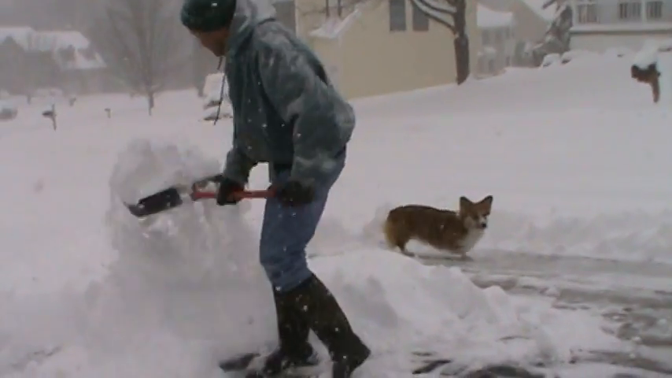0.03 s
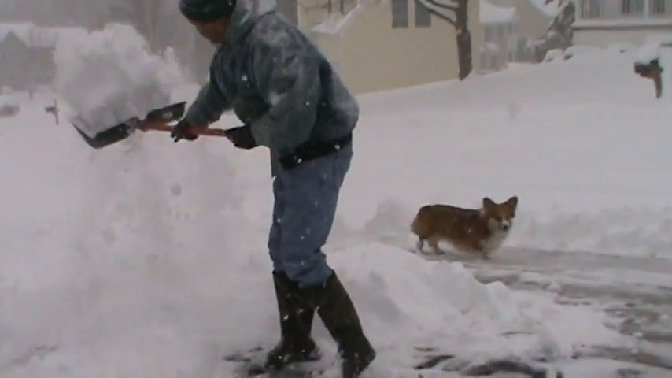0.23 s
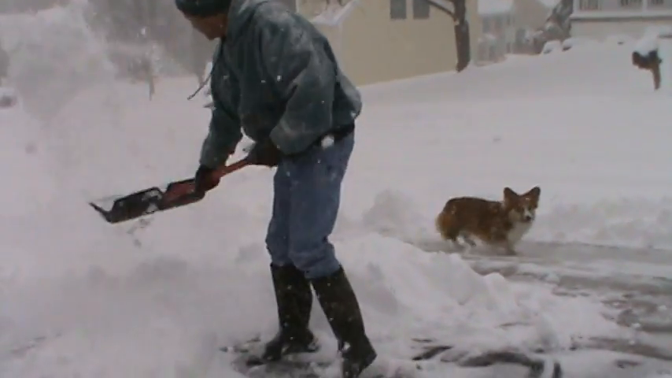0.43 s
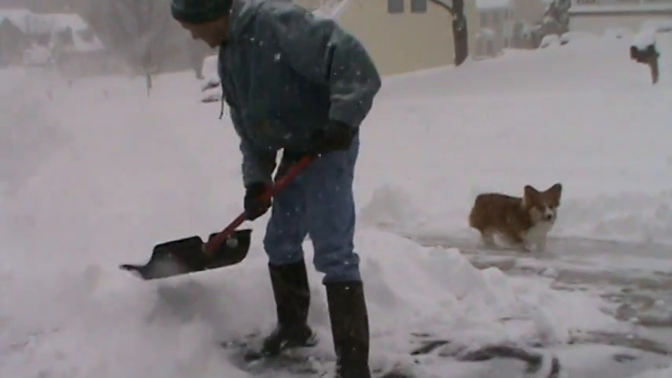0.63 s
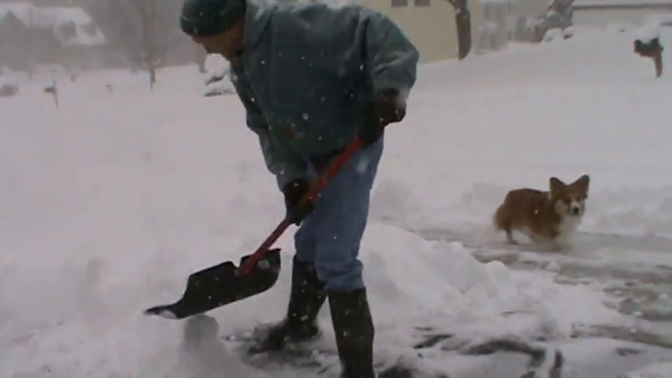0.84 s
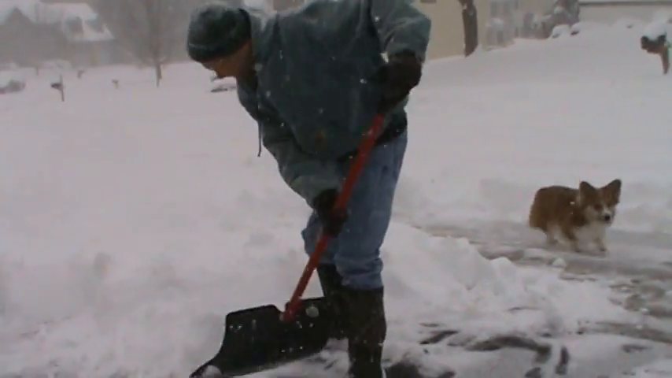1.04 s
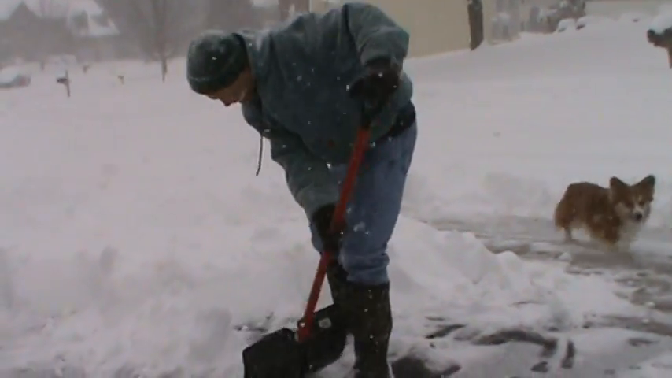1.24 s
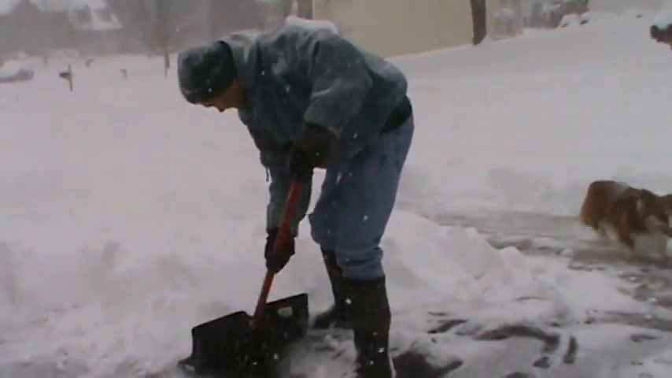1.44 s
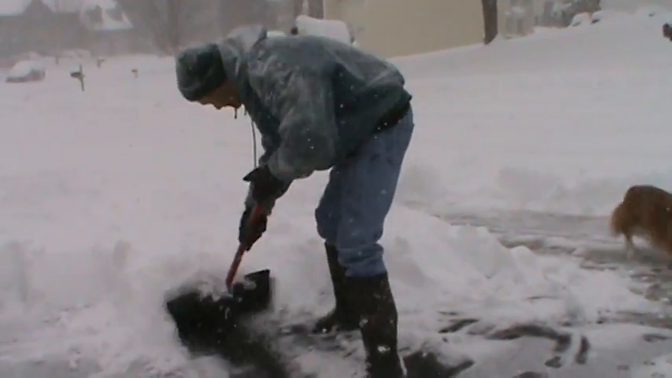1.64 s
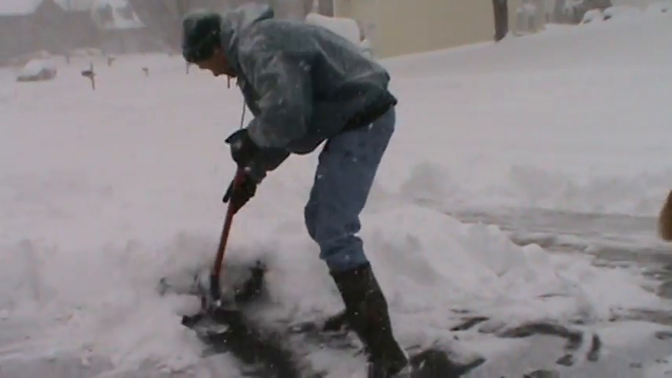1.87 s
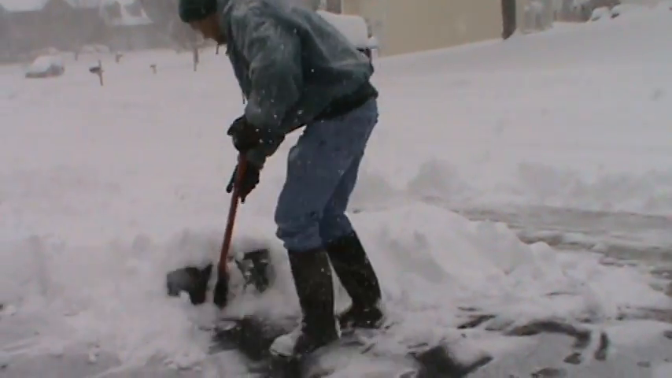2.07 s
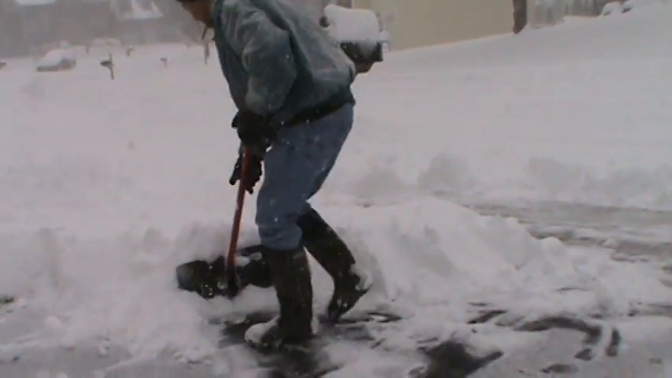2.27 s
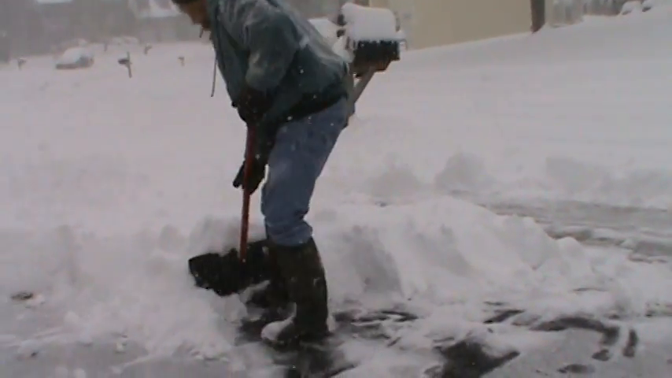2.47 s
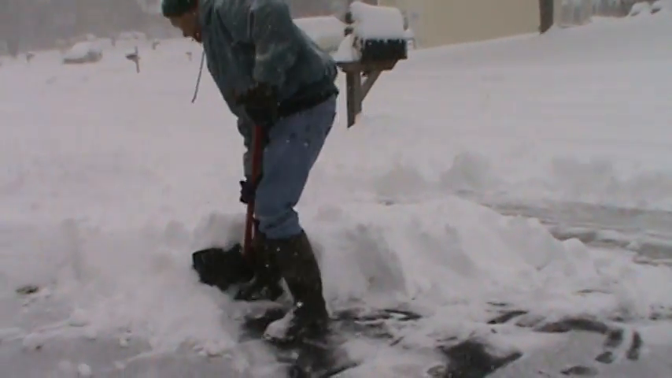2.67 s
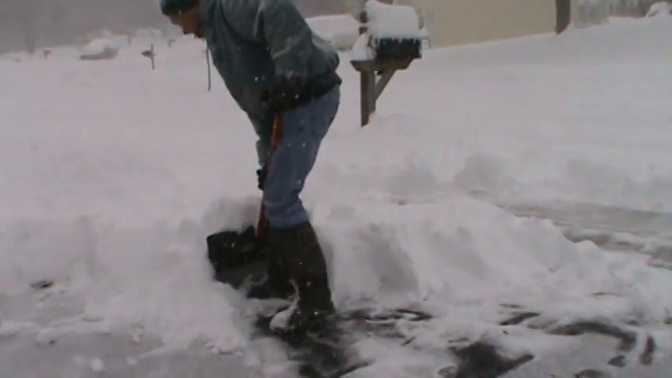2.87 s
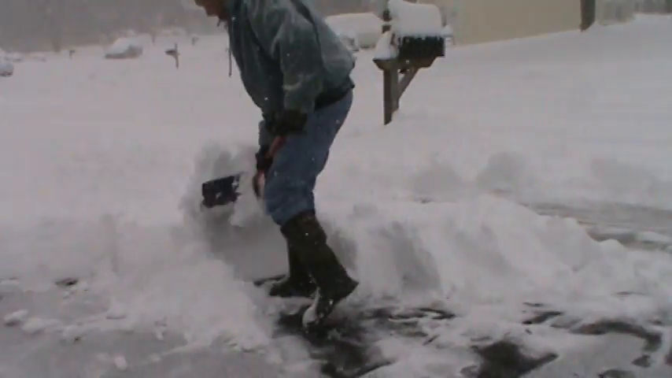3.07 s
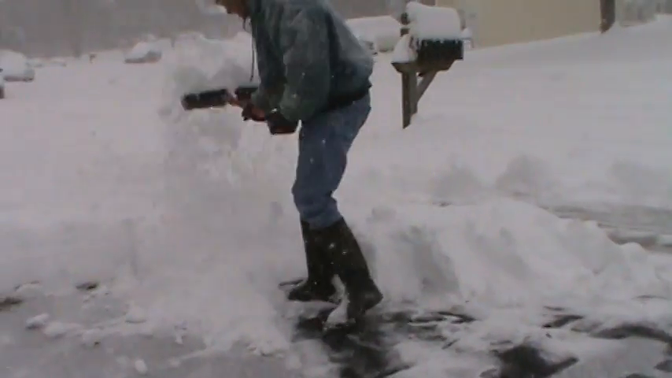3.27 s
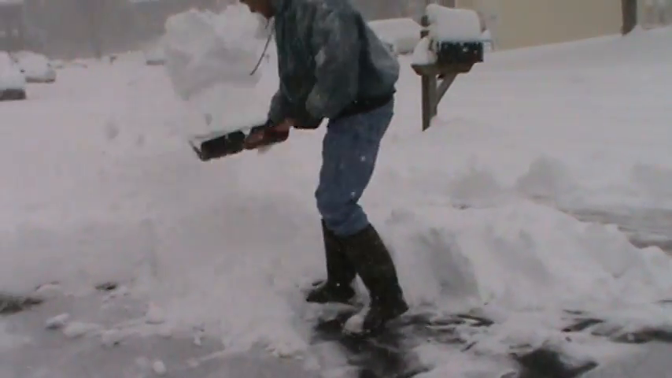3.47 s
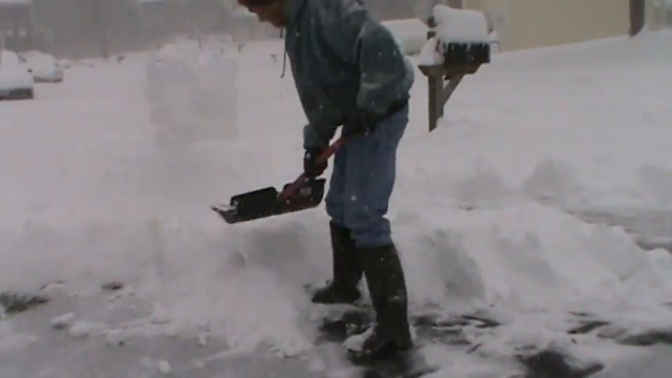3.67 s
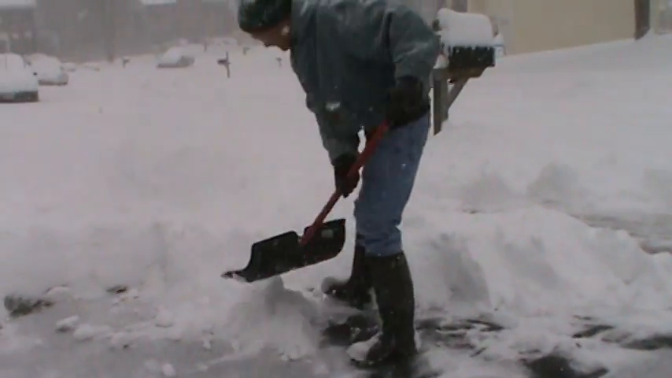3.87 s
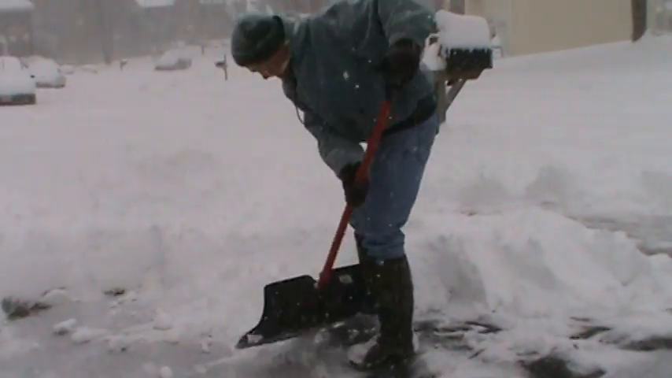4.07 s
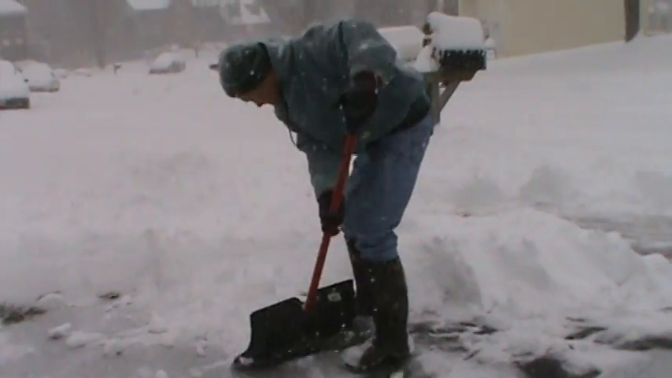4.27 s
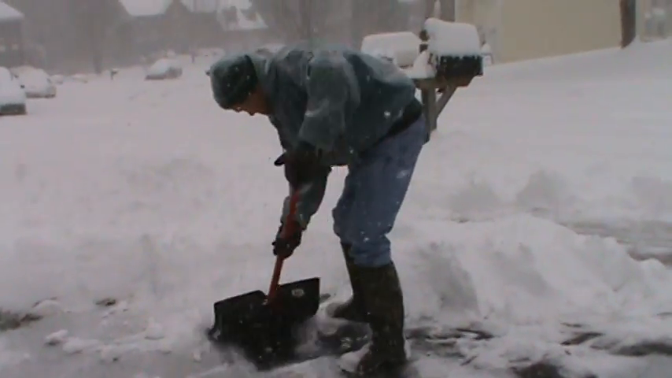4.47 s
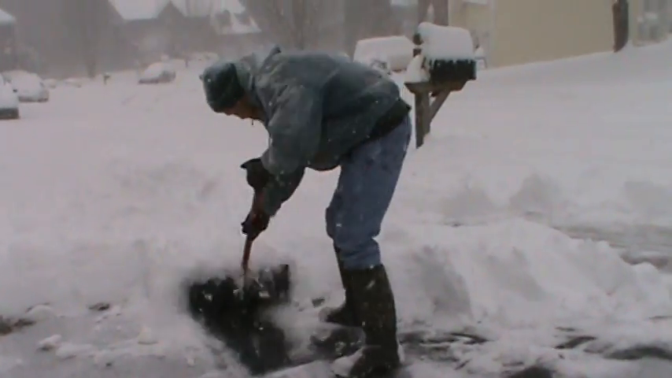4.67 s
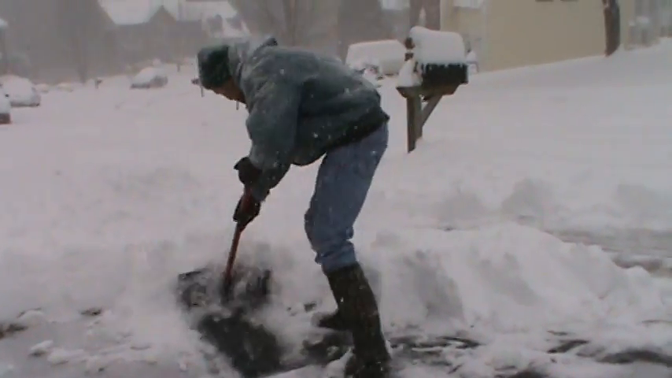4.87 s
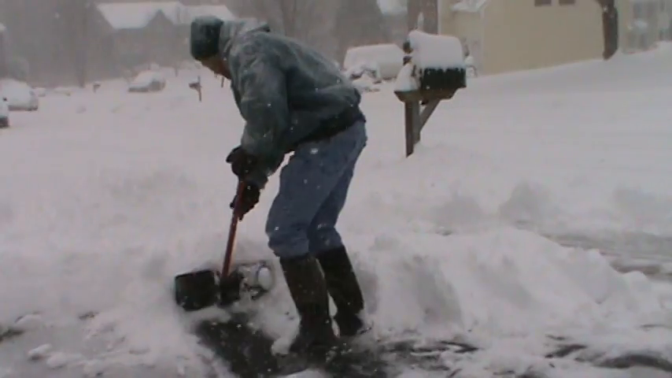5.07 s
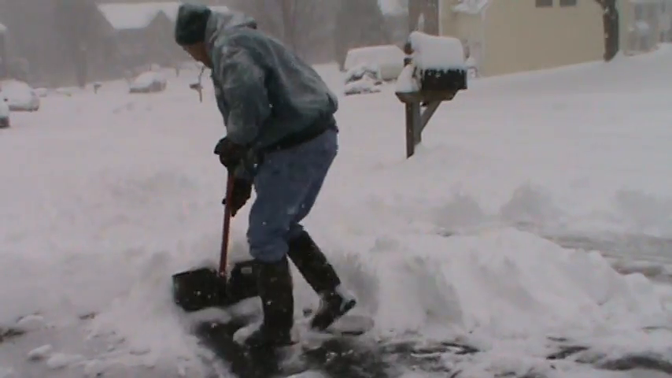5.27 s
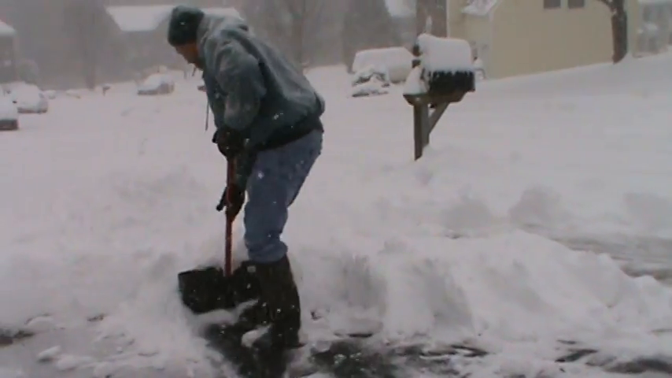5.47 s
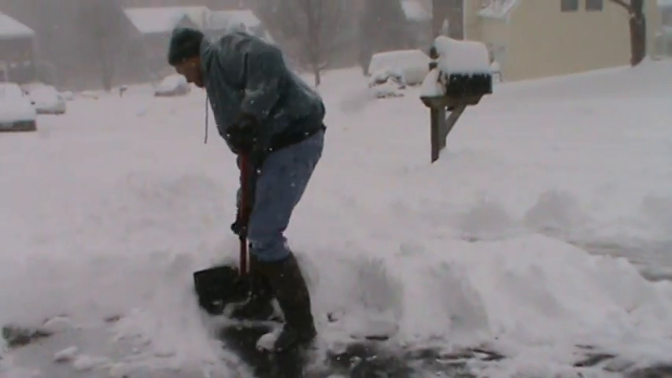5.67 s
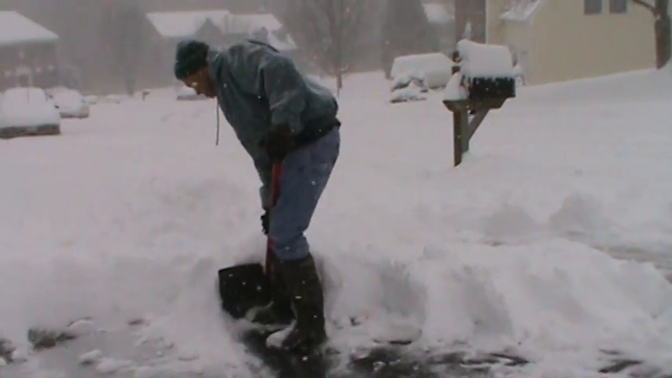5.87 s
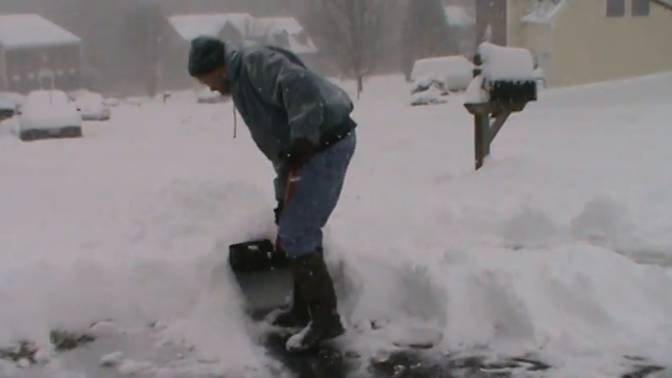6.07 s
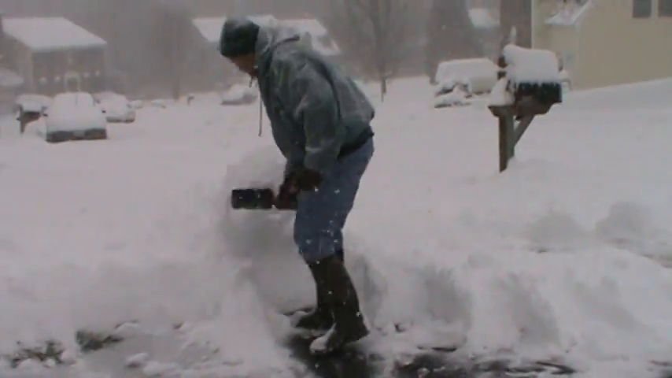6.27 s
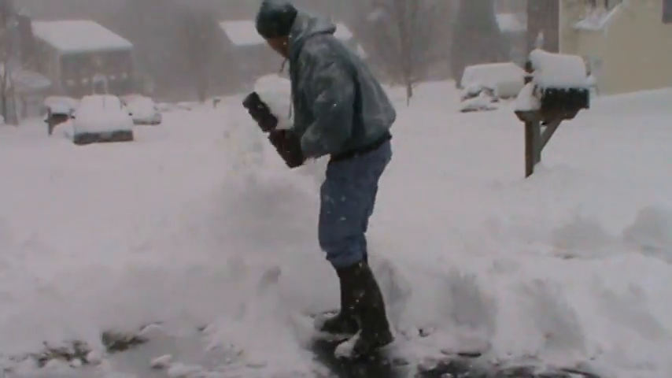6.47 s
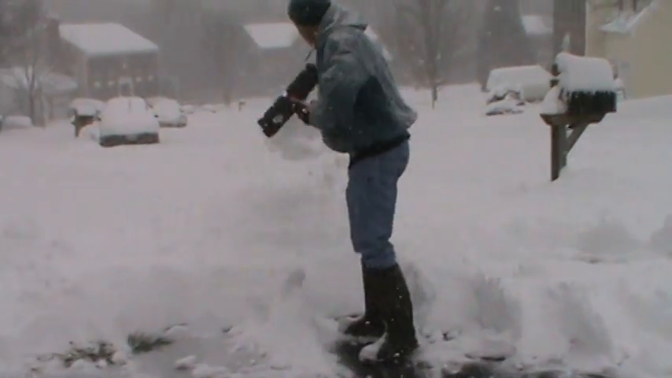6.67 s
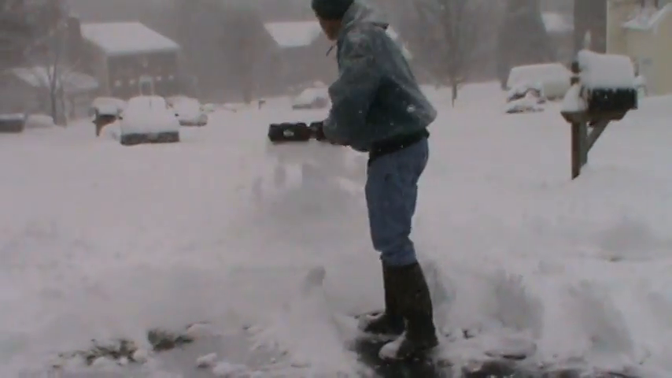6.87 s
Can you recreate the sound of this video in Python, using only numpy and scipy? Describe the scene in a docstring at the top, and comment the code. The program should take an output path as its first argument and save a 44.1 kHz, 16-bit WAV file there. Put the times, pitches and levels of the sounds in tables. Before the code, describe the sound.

Outdoors in falling snow, soft wind and microphone hiss underlie a jacket's rustle and small flake ticks. A plastic shovel scrapes harshly over gritty paving for about half a second, then boots shuffle, snow crunches and dull knocks sound. A second similar scrape follows, then more scuffs, sparse ticks and a final hollow blade knock. Heard from a few metres away on a small camera microphone.

```python
"""Soft wind, microphone hiss and a jacket's rustle open the scene; flakes soon tick on a small camera in falling snow.
Boots shuffle and scuff, the shovel knocks, and its plastic blade is pushed twice over snowy paving a few metres off.
Wind and rustle are filtered noise and clicks in swells; ticks and knocks are short damped tones.
In each push, grit clicks are heard direct and as rasp, and separate chatter rings the lower blade modes;
catches on the edge jolt them all, and a last knock on the blade ends the scene."""
import sys
import numpy as np
from scipy import signal
from scipy.fft import rfft, irfft, next_fast_len
from scipy.io import wavfile
from scipy.ndimage import uniform_filter1d

SR = 44100
rng = np.random.default_rng(int(sys.argv[2]) if len(sys.argv) > 2 else 0)


def put_to_file(sound):
    """Save the sound as 16-bit audio at rate SR, in the file named by the first command-line argument."""
    columns = np.atleast_2d(sound).T  # one column per channel
    safe = np.clip(columns, -1, 1)
    whole_steps = np.round(safe * 32767)
    wavfile.write(sys.argv[1], SR, whole_steps.astype(np.int16))


N = 304767

SIZE = next_fast_len(N + 4096)
BINS_HZ = np.maximum(np.arange(SIZE // 2 + 1) * SR / SIZE, 1)
CREST_DB = 9  # allowance for peaks of a noisy burst over its rms


def undb(db):
    """Gain of a level in dB."""
    return 10 ** (np.asarray(db) / 20)


def unit(x):
    """Scaled to rms 1."""
    return x / np.sqrt(np.mean(x ** 2))


def over_hz(table):
    """A (Hz, value) table read at every bin, linear in log frequency."""
    hz, value = np.transpose(table)
    return np.interp(np.log(BINS_HZ), np.log(np.maximum(hz, 1)), value)


def colour(x, table):
    """Causal minimum-phase filter with the given (Hz, dB) gain, from the folded cepstrum."""
    cepstrum = irfft(over_hz(table) * np.log(10) / 20, SIZE)
    cepstrum[1:SIZE // 2] *= 2
    cepstrum[SIZE // 2 + 1:] = 0
    response = np.exp(rfft(cepstrum))
    return irfft(rfft(x, SIZE) * response, SIZE)[:N]


def walk(rate_hz):
    """Random levels held 1 / rate_hz, slewed by two moving averages; rms 1."""
    hold = int(SR / rate_hz)
    steps = np.repeat(rng.standard_normal(N // hold + 1), hold)
    return unit(uniform_filter1d(uniform_filter1d(steps, hold), hold)[:N])


def grains(rate_hz, spread_db, bed):
    """Dense random clicks of uneven but bounded size over a bed of hiss."""
    size = undb(spread_db * np.minimum(rng.exponential(size=N), 4.5))
    clicks = (rng.random(N) < rate_hz / SR) * size * rng.choice([-1, 1], N)
    return unit(unit(clicks) + bed * rng.standard_normal(N))


def curves(tables):
    """Level column (silent outside the tables) and columns relative to it, as gains per sample."""
    out = np.zeros((len(tables[0][0]) - 1, N))
    for table in tables:
        s, db, *relative_db = np.transpose(table)
        span = np.arange(max(int(s[0] * SR), 0), min(int(s[-1] * SR), N))
        out[:, span] += undb([np.interp(span / SR, s, db + rel) for rel in [0, *relative_db]])
    return out


def bursts(starts_s, dbs, fades_s, rise_s):
    """Gain envelope: a quick exponential rise at each start under a 60 dB fade."""
    out = np.zeros(N)
    for s, db, fade_s in zip(starts_s, dbs, np.broadcast_to(fades_s, len(starts_s))):
        i = int(s * SR)
        t = np.arange(min(N - i, int(fade_s * SR))) / SR
        out[i:i + len(t)] += undb(db - 60 * t / fade_s) * (1 - np.exp(-t / rise_s))
    return out


def swells(peaks_s, dbs, rises_s, falls_s):
    """Gain envelope: the level climbs steadily to each rounded peak and sinks again."""
    round_db = -1  # how far the top is rounded off
    t, out = np.arange(N) / SR, np.zeros(N)
    for s, db, rise_s, fall_s in zip(peaks_s, dbs, rises_s, falls_s):
        span = slice(max(int((s - 2 * rise_s) * SR), 0), int((s + 2 * fall_s) * SR))
        lag = t[span] - s
        drop_db = 20 * lag / np.where(lag < 0, rise_s, fall_s)
        out[span] += undb(db + round_db - np.hypot(round_db, drop_db))
    return out


def pings(table, fades_s, rough_rad):
    """Short decaying tones, their phase roughened by random stretches of rough_rad."""
    out = np.zeros(N)
    seeds = rng.integers(0, N // 2, len(table))
    for (s, db, hz, *_), fade_s, seed in zip(table, fades_s, seeds):
        i = int(s * SR)
        t = np.arange(min(N - i, int(fade_s * SR))) / SR
        phase = 2 * np.pi * hz * t + rough_rad[seed:seed + len(t)] - rough_rad[seed]
        out[i:i + len(t)] += undb(db - 60 * t / fade_s) * np.sin(phase) * (1 - np.exp(-t * hz * 2))
    return out


def air():
    """Wind and hiss as coloured noise; the bass swells in gusts, part of the midrange differs between the ports."""
    # spectrum shape: freq_hz, level_db (per Hz)
    air_spectrum = [(35, -10), (60, -7.5), (118, -6.5), (212, -1), (503, -14), (566, -16), (946, -16),
                    (1140, -20.5), (1950, -20.5), (2250, -23), (4530, -24.5), (7750, -23), (11300, -26.5),
                    (14900, -28.5), (16000, -24)]
    # side re mid: freq_hz, level_db
    air_side = [(60, -53), (110, -32.5), (200, -24), (380, -10.5), (700, -3.5), (1290, -1), (2380, -1),
                (4400, -4), (8120, -14.5), (15000, -10)]
    level_db = -51  # mid rms
    gust = undb(1.4 * walk(1.24) + 2.0 * walk(9.9))
    mid, side = rng.standard_normal((2, N))
    bass = signal.lfilter(*signal.butter(2, 400, fs=SR), mid)
    mid = colour(mid + bass * (gust - 1), air_spectrum)
    side = colour(colour(side, air_spectrum), air_side)
    return undb(level_db) / np.std(mid) * np.array([mid + side, mid - side])


def buffet():
    """Wind buffeting the ports: low pressure noise, unrelated at the two."""
    # time_s, level_db
    buffet_levels = [
        [(0.0, -72), (0.02, -81), (1.19, -76), (1.59, -56), (1.75, -89), (4.94, -57), (5.16, -69), (5.27, -51),
         (5.37, -69), (5.79, -64), (5.87, -50), (5.96, -66), (6.2, -80), (6.91, -59)],
    ]
    band = signal.butter(2, [9, 56], "band", fs=SR, output="sos")
    gust = undb(1.8 * walk(5))
    pressure = [unit(signal.sosfilt(band, noise)) for noise in rng.standard_normal((2, N))]
    return curves(buffet_levels) * gust * pressure


def shuffle():
    """Cloth swishes, snow crunches in fine grains and packs with a duller creak, bursting at each scuff."""
    # jacket and boots: peak_s, swish_db, rise_s, fall_s (slopes over 20 dB), crunch_re_swish_db
    rustles = [(.032, -45.5, 0.2, .05, -13), (.17, -55.5, 0.075, 0.26, 3), (.5, -60, 0.036, 0.029, -4),
               (.745, -53, 0.035, 0.11, -12), (.87, -55, 0.13, 0.11, 0), (.93, -45, 0.11, 0.23, -14),
               (1.016, -37, 0.024, 0.097, -12), (1.08, -64.5, 0.15, 0.21, 9.5),
               (1.18, -49, 0.04, 0.21, -3.5), (1.97, -52, 0.24, 0.11, -8.5), (2.11, -67, 0.051, 0.051, -18),
               (2.3, -70, 0.26, 0.16, 1), (2.564, -34.5, 0.053, 0.045, -17), (2.63, -43, 0.042, 0.14, -5),
               (2.817, -50.5, 0.044, .1, -10), (2.98, -57, 0.067, .08, -13), (3.05, -51, 0.074, 0.11, -11),
               (3.14, -49.5, 0.054, 0.065, -21), (3.27, -53, 0.06, 0.25, -5.5),
               (3.536, -42, 0.056, 0.022, -14.5), (3.73, -45.5, 0.022, 0.065, -9),
               (3.84, -49.5, 0.056, 0.076, -9), (3.95, -47, 0.13, 0.13, -7.5),
               (4.04, -55, 0.086, 0.077, 3.5), (4.09, -53, 0.068, 0.9, -5),
               (4.227, -47.5, 0.016, 0.24, -1.5), (4.976, -46, 0.027, 0.032, -17),
               (5.244, -46.5, 0.038, 0.037, -8), (5.596, -35, 0.042, 0.079, -17.5),
               (5.645, -41, 0.021, 0.11, -6), (5.78, -54, 0.048, 0.037, -4),
               (5.874, -37, 0.027, 0.057, -11), (6.8, -60.5, 0.17, 0.54, 3.5)]
    # boot or blade: start_s, peak_db, crunch_re_peak_db, fade_s (60 dB)
    scuffs = [(0.732, -34.5, -8, 0.077), (2.2113, -18, -22, 0.023), (2.5247, -41, -22, 0.05),
              (2.9014, -25, -11, 0.038), (3.72, -21, -17, 0.043), (5.2357, -19.5, -20, 0.041),
              (5.5608, -38, -16, 0.039), (5.857, -27.5, -7, 0.057)]
    # spectrum shapes: freq_hz, level_db (per Hz)
    swish_spectrum = [(2650, -33), (4500, -13), (5510, -8), (5900, -2.5), (8200, 3), (9770, -9),
                      (10700, -9.5), (12200, -22.5), (16000, -22)]
    crunch_spectrum = [(790, -17.5), (1350, 0.5), (1990, 2.5), (2440, -1.5), (2640, -0.5), (4270, -0.5),
                       (5200, -5.5), (6760, -13), (11400, -120)]
    pack_spectrum = [(250, -32.5), (430, -9.5), (537, 0), (687, -5), (740, -3.5), (1400, -13), (1820, -39),
                     (3080, -120)]
    stir_db, stir_crunch_db = -64.5, -3.5  # faint rustle that never stops; its crunch re swish
    settle_db, settle_s = -15.5, 0.36  # loose snow settling: re scuff peak; 60 dB fade
    pack_db = -2.5  # re crunch

    peak_s, swish_db, rise_s, fall_s, share_db = np.transpose(rustles)
    s, db, crunch_db, fade_s = np.transpose(scuffs)

    def settle(peak_db):
        """Gain of loose snow settling after each scuff."""
        return bursts(s, peak_db + settle_db - CREST_DB, settle_s, 0.0026)

    bed = undb(stir_db + 2.9 * walk(11))
    swish_gain = bed + swells(peak_s, swish_db, rise_s, fall_s) + settle(db)
    crunch_gain = bed * undb(stir_crunch_db) + swells(peak_s, swish_db + share_db, rise_s, fall_s)
    crunch_gain = crunch_gain + settle(db - 6.5)
    scuff_swish = bursts(s, db - CREST_DB, fade_s, 0.001)
    scuff_crunch = bursts(s, db + crunch_db - CREST_DB, fade_s, 0.00079)

    stir = 1.4 * walk(45)
    fine = unit(grains(rate_hz=2800, spread_db=2.0, bed=1.46) * undb(stir + 2.0 * walk(150)))
    coarse = unit(grains(rate_hz=600, spread_db=2.5, bed=1.0) * undb(stir + 1.16 * walk(80)))
    swish = unit(colour(fine, swish_spectrum)) * (swish_gain + scuff_swish)
    crunch = unit(colour(fine + coarse, crunch_spectrum)) * (crunch_gain + scuff_crunch)
    pack = unit(colour(coarse, pack_spectrum)) * crunch_gain * undb(pack_db)
    return swish + crunch + pack


def ticks():
    """Flakes and ice grains tick, and a bright ring colours the scuff at 2.9 s: rough short tones with a sparkle."""
    # start_s, peak_db, pitch_hz, sparkle_re_peak_db
    tick_table = [(0.1286, -49, 7390, -18), (0.9064, -24.5, 4200, -36), (0.9068, -28, 5560, -30),
                  (1.8844, -32, 7700, -10), (2.4134, -34.5, 7300, -3), (2.4854, -49, 7500, -11),
                  (2.9028, -24, 6870, -24), (2.905, -26, 4350, -30), (3.3714, -33, 8500, -22),
                  (3.432, -36.5, 7650, -25), (3.669, -40, 6790, -10), (4.1294, -40, 7250, -25),
                  (4.8877, -30, 7850, 3), (4.991, -32, 8700, -25), (5.4465, -35, 7000, -23),
                  (5.7797, -39, 7350, -23), (5.9886, -27.5, 9100, -22), (6.0194, -39, 8060, 0),
                  (6.0664, -43, 6880, -2), (6.1704, -38.5, 9310, -1), (6.2254, -44, 7410, -4),
                  (6.3273, -38.5, 7400, -5), (6.6827, -56, 7250, -18), (6.7014, -41, 3100, -26),
                  (6.788, -43, 7060, -11), (6.8544, -43, 1290, -14)]
    sparkle_hz = 14000
    fades_s = np.full(len(tick_table), 0.009)
    sparkle = [(s, db + top_db, sparkle_hz) for s, db, hz, top_db in tick_table]
    return pings(tick_table, fades_s, 1.43 * walk(3000)) + pings(sparkle, fades_s, 1.3 * walk(3000))


def knocks():
    """Dull knocks, and two short ticks near 1.8 kHz: a few cycles of a damped mode and an overtone."""
    # start_s, peak_db, pitch_hz, fade_s (60 dB)
    knock_table = [(0.818, -38, 109, 0.086), (2.213, -29.5, 295, 0.033), (2.262, -29.5, 820, 0.015),
                   (2.583, -13, 142, 0.028), (2.767, -21, 560, 0.034), (2.902, -30, 151, 0.041),
                   (3.095, -28, 295, 0.023), (3.268, -43, 1100, 0.03), (3.37, -32, 607, 0.019),
                   (4.908, -27.5, 810, 0.028), (4.921, -21, 153, 0.029), (5.053, -37, 1830, 0.013),
                   (5.347, -37.5, 1720, 0.014), (5.236, -37, 159, 0.084), (5.266, -35, 75, 0.076),
                   (5.601, -34, 89.5, .08), (5.865, -36, 80, 0.07), (6.89, -12.5, 239, 0.036),
                   (6.89, -22, 700, 0.025)]
    fades_s = np.transpose(knock_table)[3]
    rough_rad = 0.76 * walk(130)
    overtones = [(s, db - 16.5, 1.67 * hz) for s, db, hz, fade_s in knock_table]
    thuds = pings(knock_table, fades_s, rough_rad) + pings(overtones, 1.06 * fades_s, rough_rad)
    # the rough phase leaves stray DC and rumble; keep only what lies above about 60 Hz
    return signal.sosfilt(signal.butter(3, 60, "high", fs=SR, output="sos"), thuds)


def push_gains():
    """Gains of grit and rasp, then of the blade's thrum, boom, body and clatter."""
    # one table per push: time_s, grit_db, then re grit: upper_db, low_db, lowest_db (blade modes)
    pushes = [
        [(1.263, -35, -11, -4, -11), (1.267, -21, -8.5, -11, -14), (1.277, -18.5, -6, -17, -24),
         (1.287, -30.5, 4, -3, -5), (1.329, -18.5, -6.5, -14.5, -15), (1.429, -21, -4, -3, -14),
         (1.459, -22, -2, 9, -1), (1.493, -21, -7, -4.5, -11), (1.523, -20.5, 2.5, -7, -18),
         (1.561, -22.5, 6.5, -2.5, -5), (1.633, -21.5, 4, -4, -9.5), (1.799, -36.5, 6, -13, -2),
         (1.835, -41.5, -1, -10, -10), (1.92, -52.5, -4.5, -8, 1)],
        [(4.254, -39.5, 5, 13, -1), (4.328, -19, -5, -8.5, -18), (4.408, -21, -1, -0.5, -13),
         (4.444, -19.5, -13.5, -10, -12), (4.46, -19, -12, -12, -21), (4.498, -22.5, -17, -19, -24),
         (4.504, -21.5, -7, -20, -15), (4.576, -23, 5.5, -4, -17), (4.686, -23, 4.5, -9, 1),
         (4.698, -29.5, 3, -6.5, -1), (4.774, -30, 10.5, 0.5, 0), (4.854, -39, 5.5, -7, -1),
         (4.892, -45, -0.5, -14, -14), (4.94, -53, -6, -4, 8)],
    ]
    grit, upper, low, lowest = curves(pushes)

    def between(a, b, share, db):
        """Geometric blend of two gains, share being that of b."""
        return undb(db) * a ** (1 - share) * b ** share

    rasp = between(grit, upper, share=0.54, db=-3)
    body = between(upper, low, share=0.38, db=-1)
    return grit, rasp, lowest, low, body, upper


def ring(x, modes, wander_db):
    """Resonances, each filtered twice, with slowly wandering levels of their own."""
    out = 0
    for k, (hz, width_hz, db) in enumerate(modes):
        # each pass is 2.08 widths wide
        mode = signal.tf2sos(*signal.iirpeak(hz, hz / width_hz / 2.08, fs=SR))
        tone = unit(signal.sosfilt(np.vstack([mode, mode]), x))
        level = np.sqrt(width_hz) * undb(db + wander_db * walk(21.95))
        out = out + (-1) ** k * tone * level
    return unit(out)


def shovel():
    """The edge's grit clicks are heard direct and as rasp; separate chatter rings the lower blade modes."""
    # edge catching in the pushes; last two rows: final knock on the blade: start_s, peak_db, blade_re_peak_db
    catches = [(1.268, -11, -18), (1.277, -7.5, -5.5), (1.298, -2.5, -13), (1.323, -16, -20),
               (1.343, -17, 0), (1.5174, -24, -15), (1.579, -20, 1), (1.6774, -3, -18), (1.724, -1, -21),
               (1.765, -7, -11.5), (1.7947, -12, -4.5), (4.2582, -26, -11), (4.2924, -8, -10),
               (4.3084, -3, -18), (4.3213, -4, -18), (4.349, -10, -43), (4.3574, -28, -21),
               (4.3644, -32, -13), (4.3874, -9, -16), (4.4014, -9, -25), (4.439, -7, -19),
               (4.506, -2.5, -9), (4.5247, -10, -36), (4.682, -11, -6), (4.7114, -9.5, 4.5),
               (4.7774, -36, -10), (6.8869, -11, -11), (6.8912, -10, -5.5)]
    # spectrum shape: freq_hz, level_db (per Hz)
    grit_spectrum = [(3240, -53), (5500, -9), (6260, -3), (7930, 2), (8450, -3), (9830, -14), (11200, -17),
                     (12600, -30.5), (13300, -30), (15200, -28), (16000, -26.5)]
    # modes of the plastic blade: freq_hz, width_hz, level_db (per Hz, within its group)
    blade_modes = [(162, 91, -6.5), (240, 49, 10.5), (331.7, 54, -3), (397, 75, -7), (539, 97, 0.5),
                   (610, 77, 5), (719, 113, 0), (964, 103, 0.5), (1094, 45, -1), (1226, 155, -0.5),
                   (1450, 113, -3.5), (1612, 130, -4), (1940, 157, 3.5), (2310, 440, -3.5),
                   (2900, 350, -1.5), (3185, 240, 3), (3690, 340, -1), (4420, 680, -1.5), (4690, 120, 3.5),
                   (5220, 450, -9)]
    # bounds of thrum, boom, body, clatter, rasp: edge_hz
    group_edges = [100, 280, 450, 850, 1800, 5800]
    click_db = -18  # click before its filters, re catch peak

    grit_gain, rasp_gain, *blade_gains = push_gains()
    s, db, blade_db = np.transpose(catches)
    groups = [[m for m in blade_modes if lo < m[0] < hi] for lo, hi in zip(group_edges, group_edges[1:])]
    judder = 0.22 * walk(60)  # the whole blade skips together
    flurry = 2.6 * walk(420)  # stones pass under the edge in flurries of a few milliseconds
    edge = grains(rate_hz=1600, spread_db=2.0, bed=1.0) * undb(judder + flurry)
    snap = bursts(s, db - CREST_DB, 0.011, 0.00036)
    grit = unit(colour(edge, grit_spectrum) * undb(0.32 * walk(90))) * (grit_gain + 0.54 * snap)
    rasp = ring(edge, groups[-1], wander_db=2.0) * (rasp_gain + 0.51 * snap)

    impulses = np.zeros(N)
    impulses[(s * SR).astype(int)] = undb(db + click_db)
    click_band = signal.butter(2, [900, 5000], "band", fs=SR, output="sos")
    clicks = colour(impulses, grit_spectrum) + signal.sosfilt(click_band, impulses)

    out = grit + rasp + clicks
    jolt = 0.81 * bursts(s, db + blade_db - CREST_DB, 0.029, 0.00067)
    for modes, gain in zip(groups, blade_gains):
        chatter = grains(rate_hz=770, spread_db=0.0, bed=0.97) * undb(judder + 2.4 * walk(120))
        # gains smoothed over a few milliseconds, so that level steps do not click
        out = out + ring(chatter, modes, wander_db=0.17) * uniform_filter1d(gain + jolt, size=130)
    return out


def ports(x):
    """Two close microphone ports: their difference is a weaker, phase-turned copy plus scattered reflections."""
    # side re mid: freq_hz, level_db
    port_side = [(60, -27), (130, -10), (260, -10), (600, -11), (1300, -15), (2400, -16.5), (4400, -12.5),
                 (6000, -24), (8100, -84), (10500, -4), (13000, -22), (15800, -11)]
    turn_rad = 1.66  # lead of the side signal
    scatter_db, scatter_s = -24, 0.078  # sideways reflections: re side signal; 60 dB fade
    t = np.arange(2048) / SR
    tail = rng.standard_normal(len(t)) * undb(-60 * t / scatter_s)
    scatter = undb(scatter_db) * rfft(tail / np.linalg.norm(tail), SIZE)
    response = undb(over_hz(port_side)) * (np.exp(1j * turn_rad) + scatter)
    side = irfft(rfft(x, SIZE) * response, SIZE)[:N]
    return np.array([x + side, x - side])


def scene():
    """Rustle, ticks, knocks and shovel in front of the ports, over the air and buffeting."""
    return air() + buffet() + ports(shuffle() + ticks() + knocks() + shovel())


def record(dry):
    """The camera rounds the loudest peaks and cuts the top steeply."""
    rounded = np.tanh(0.86 * dry) / 0.96
    top_cut = signal.ellip(12, 0.2, 75, 15900, fs=SR, output="sos")  # order, ripple dB, stop dB, Hz
    return signal.sosfilt(top_cut, rounded)


dry = scene()
out = record(dry)
put_to_file(out)
```